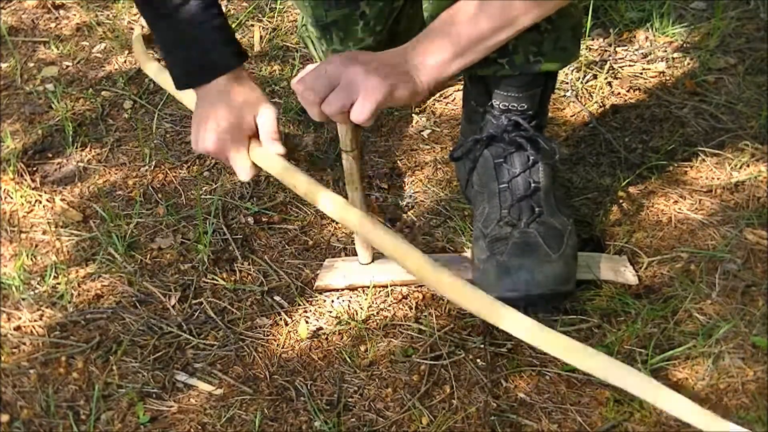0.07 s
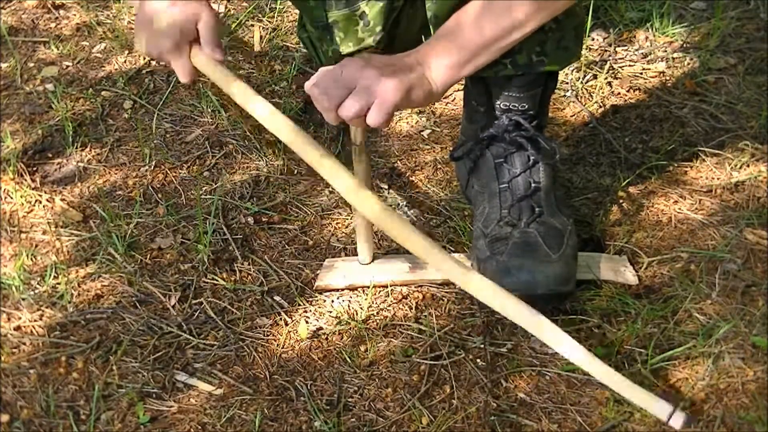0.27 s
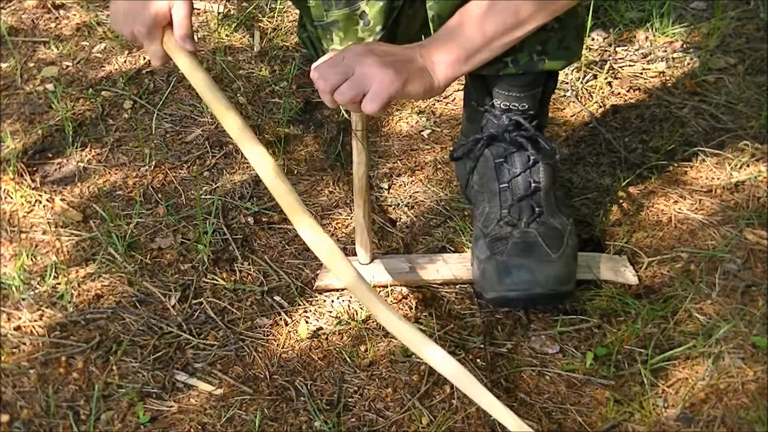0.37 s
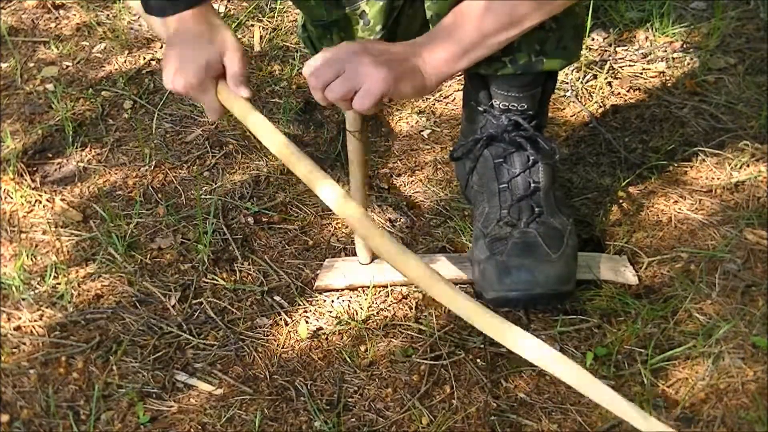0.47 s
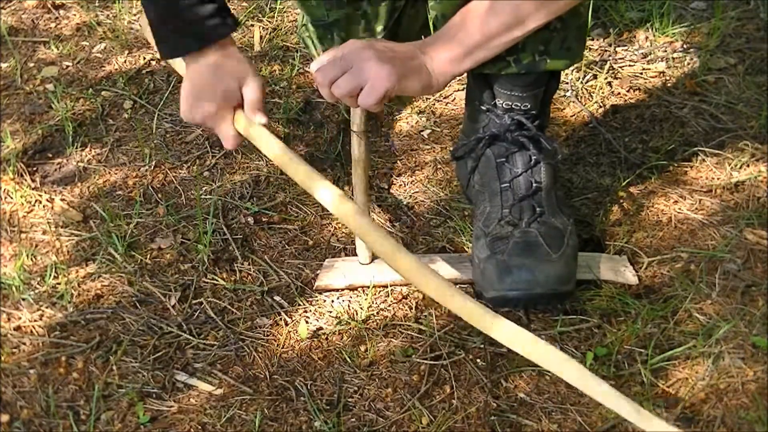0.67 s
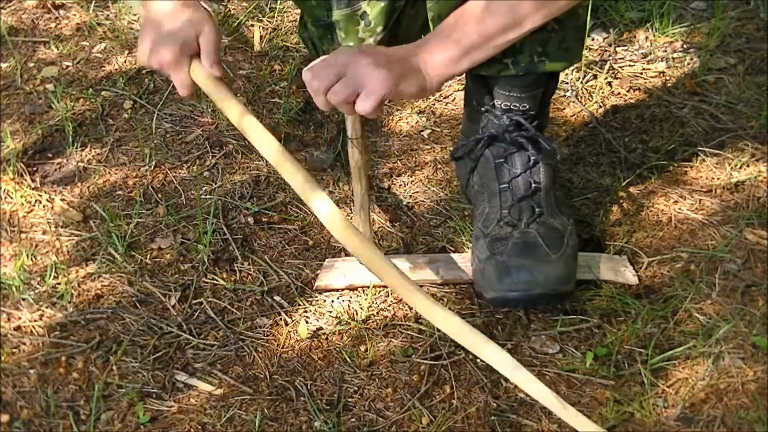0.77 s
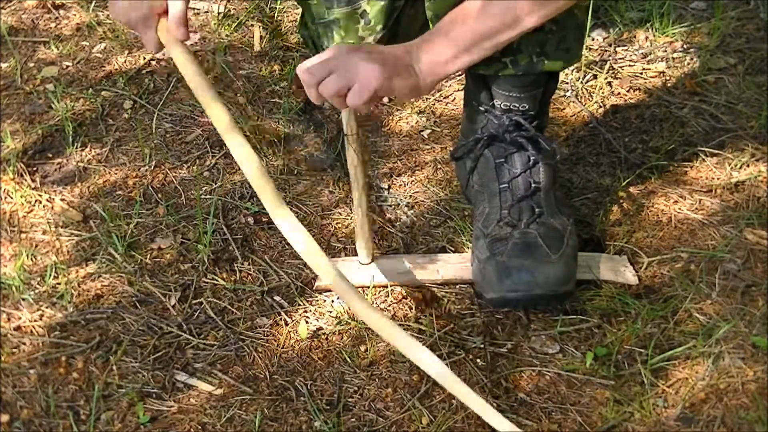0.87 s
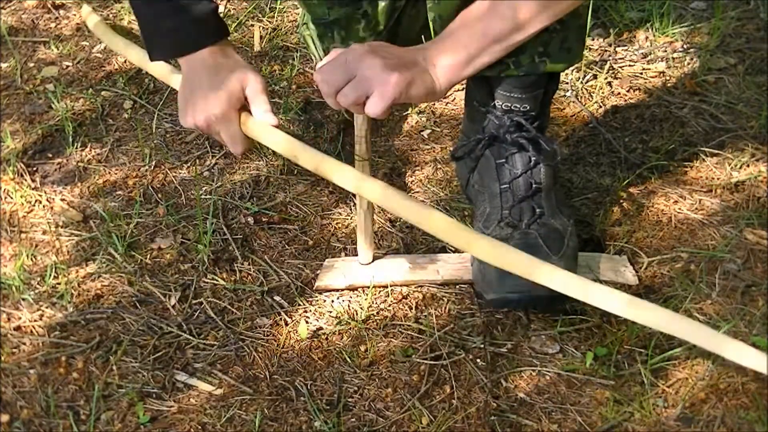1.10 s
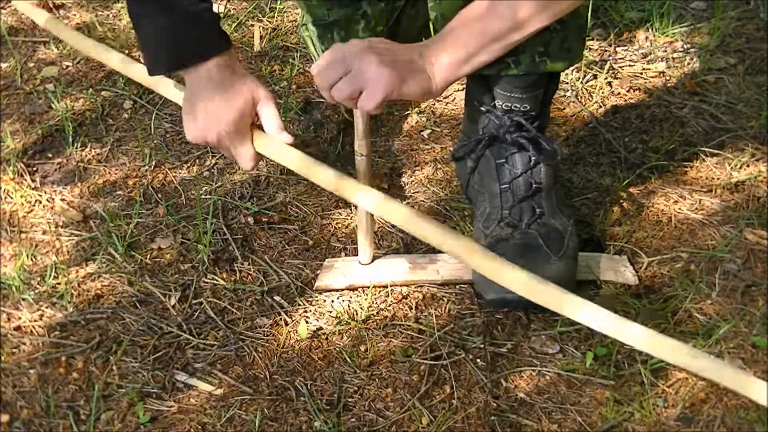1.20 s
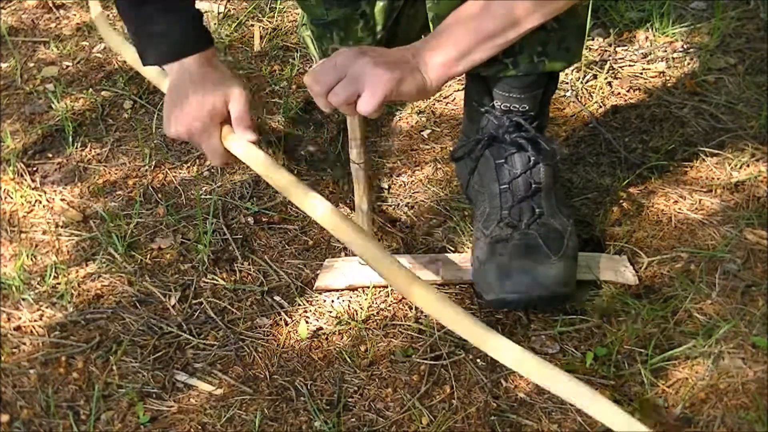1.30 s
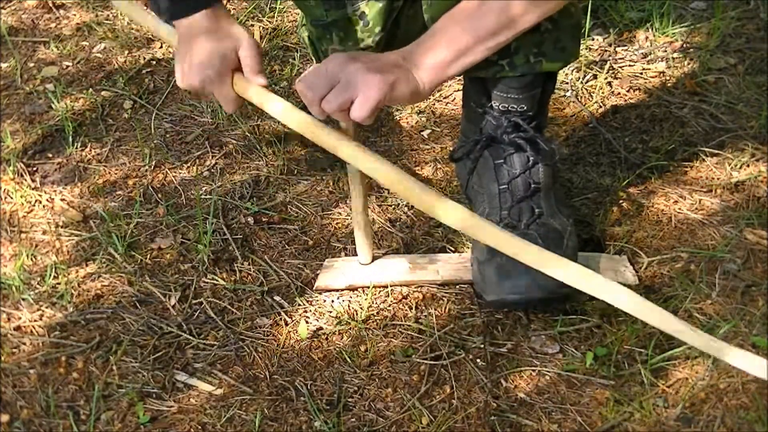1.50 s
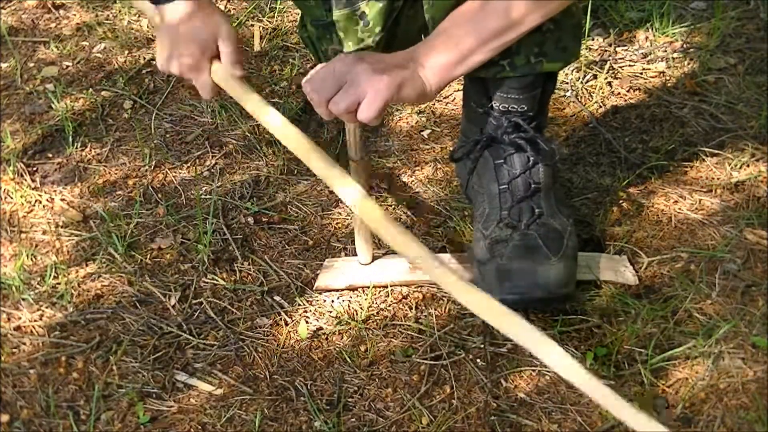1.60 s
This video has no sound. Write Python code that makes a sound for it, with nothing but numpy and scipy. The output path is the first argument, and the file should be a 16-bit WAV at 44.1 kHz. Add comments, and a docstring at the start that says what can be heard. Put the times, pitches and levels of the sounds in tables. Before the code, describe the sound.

A wooden bow drill rasps against a board in about five uneven strokes, close to the microphone. The spindle chirps twice near 0.25 seconds, squeaks around 0.5, and knocks dryly at 0.7 and just after 1 second. A softer stroke with a small chirp follows at 1.5. Dry needles tick faintly, with quiet forest air and a thin, distant whistling tone behind.

```python
"""A bow drill worked back and forth on a forest floor, close to a stereo microphone.
On each stroke the wooden spindle rasps in its socket, catches in short chirps and squeaks,
and knocks against the board. Dry needles tick on the ground and the trees return a faint echo.
Behind it lie quiet forest air and a thin, far whistle."""
import sys
import numpy as np
from scipy import signal
from scipy.fft import rfft, irfft
from scipy.io import wavfile

SR = 44100
rng = np.random.default_rng(int(sys.argv[2]) if len(sys.argv) > 2 else 0)


def wav_record(signal):
    """Record a signal, one row per channel, as 16-bit PCM in the file named by sys.argv[1]."""
    frames = np.transpose(np.atleast_2d(signal))
    bounded = np.clip(frames, -1, 1)
    # unit amplitude maps onto the largest positive 16-bit level
    quanta = np.round(bounded * 32767).astype(np.int16)
    wavfile.write(sys.argv[1], SR, quanta)


N = 72765
LEAD = SR // 10  # samples by which the close tracks start ahead of time zero


def amp(db):
    """Decibels to gain."""
    return 10 ** (np.asarray(db) / 20)


def unit(x):
    """Scales to rms 1."""
    return x / np.sqrt(np.mean(x ** 2) + 1e-20)


def read(points, hz):
    """Reads a table on a log-frequency axis."""
    f, value = np.transpose(points)
    return np.interp(np.log(hz + 1), np.log(f + 1), value)


def colour(x, points):
    """Filters by a table of (frequency [Hz], gain [dB])."""
    return irfft(rfft(x) * amp(read(points, np.fft.rfftfreq(len(x), 1 / SR))), len(x))


def wander(size, hz):
    """Smooth random drift of rms about 1, rolling off above the given rate."""
    rolloff = 1 + (np.fft.rfftfreq(2 * SR, 1 / SR) / hz) ** 4
    return unit(irfft(rfft(rng.standard_normal(2 * SR)) / rolloff))[:size]


def add(track, s, sound):
    """Mixes a sound in at s seconds; the track begins LEAD samples early."""
    part = track[max(LEAD + round(s * SR), 0):][:len(sound)]
    part += sound[:len(part)]


def burst(length, points, tilt_db=0, size=2048):
    """A puff of coloured friction noise: returns its start relative to its centre [s] and the puff."""
    t, hz = (np.arange(size) - size / 2) / SR, np.fft.rfftfreq(size, 1 / SR)
    shape = np.exp(-(2 * t / length) ** 2)
    gain = amp(read(points, hz) + tilt_db * np.log2(np.maximum(hz, 400) / 1000))
    x = rng.standard_normal(size)
    for _ in range(3):  # impose envelope and spectrum in turn
        x = irfft(gain * np.exp(1j * np.angle(rfft(x * shape))))
    return t[0], unit(x * np.hanning(size)) * np.sqrt(np.mean(shape ** 2))


def forest_air(level_db=-47):
    """Quiet, steady rustle of the forest, nearly the same in both channels."""
    # colour of the air (frequency [Hz], gain [dB])
    air_colour = [(15, -56), (25, -12.5), (102, -6.5), (274, -3), (330, -8), (409, -3), (609, -1.5),
                  (795, -2), (861, -4), (1010, -6), (1430, -8.5), (2070, -12), (2630, -15), (3350, -10),
                  (6010, -19.5), (6680, -25), (14500, -43.5)]
    # likeness of left and right (frequency [Hz], correlation [0-1])
    air_likeness = [(30, 1), (100, 0.89), (500, 0.96), (2000, 0.93), (6000, 0.9), (12000, 1)]
    left, other = rfft(rng.standard_normal((2, N)))
    same = np.clip(read(air_likeness, np.fft.rfftfreq(N, 1 / SR)), 0, 1)
    right = same * left + np.sqrt(1 - same ** 2) * other
    pair = np.array([colour(irfft(spectrum, N), air_colour) for spectrum in (left, right)])
    return amp(level_db + 0.23 * wander(N, 30)) * unit(pair)


def far_whistle(start_s=-0.3, end_s=1.5, hz=2099, level_db=-56, blur_hz=45):
    """A thin, blurred tone swells and fades far from the microphone."""
    t = np.arange(N) / SR
    progress = np.clip((t - start_s) / (end_s - start_s), 0, 1)
    swell = np.sqrt(np.sin(np.pi * progress).clip(0))
    phase = 2 * np.pi * hz * t
    tone = wander(N, blur_hz) * np.sin(phase) + wander(N, blur_hz) * np.cos(phase)
    return amp(level_db) * swell * tone


def spindle_squeaks(sag=0.033, jitter=0.024, unrest_hz=1100, shimmer_db=0.77):
    """Two stick-slip tones compete in short, unsteady bursts, each sagging slightly in pitch."""
    # squeaks (centre [s], length [s], upper tone [Hz], its level [dB], lower tone [Hz],
    # its level [dB], gain on all its harmonics but the second [dB])
    squeaks = [(-.035, 0.0083, 2832, -10, 2374, -16, -2.5), (.006, 0.0099, 2660, -31, 2460, -45, 2.5),
               (.418, .011, 2960, -29.5, 2340, -38.5, -11), (0.4432, .0065, 2964, -19, 2400, -28, -16),
               (.462, .012, 2720, -25.5, 2350, -50, -9), (0.473, .0065, 2886, -24.5, 2320, -20.5, -28),
               (.485, .0058, 2820, -8, 2310, -34, -1), (0.4922, .008, 2839, -13, 2323, -31, -23),
               (0.4948, .0036, 2728, -6.5, 2353, -12.5, -5.5), (0.498, .008, 2770, -38, 2348, -15.5, -1.5)]
    # harmonics of the upper tone, from the fundamental up (level [dB])
    upper_harmonics = [0.5, -12, -41, -25]
    # harmonics of the lower tone, likewise (level [dB])
    lower_harmonics = [-3.5, 2, -4.5, -8, -15]
    out = np.zeros(LEAD + N)
    for centre, length, upper_hz, upper_db, lower_hz, lower_db, full_db in squeaks:
        t = np.arange(-length / 2, length / 2, 1 / SR)
        bend = 1 - sag * t / length + jitter * wander(len(t), unrest_hz)
        phase_per_hz = 2 * np.pi * np.cumsum(bend) / SR
        upper = sum(amp(upper_db + db) * np.sin(k * upper_hz * phase_per_hz)
                    for k, db in enumerate(upper_harmonics, 1))
        lower = sum(amp(lower_db + db + full_db * (k != 2)) * np.sin(k * lower_hz * phase_per_hz)
                    for k, db in enumerate(lower_harmonics, 1))
        shape = np.cos(np.pi * t / length) ** 2 * amp(shimmer_db * wander(len(t), unrest_hz))
        add(out, centre - length / 2, (upper + lower) * shape)
    return out


def dry_needles():
    """Dry needles tick and shift on the ground by the drill."""
    # ticks (centre [s], length [s], level [dB], treble tilt [dB/octave])
    ticks = [(.05, .002, -48.5, 4), (.354, 0.014, -43, -6), (0.778, 0.0051, -42, -1.5),
             (0.833, 0.015, -50, 2), (1.192, .002, -50, 5)]
    # colour of a tick (frequency [Hz], gain [dB])
    tick_colour = [(80, -46), (300, 0), (900, -1.5), (3000, 3), (7500, -18), (11000, -13.5), (14000, -42)]
    out = np.zeros(LEAD + N)
    for centre, length, db, tilt_db in ticks:
        offset, puff = burst(length, tick_colour, tilt_db)
        add(out, centre + offset, amp(db) * puff)
    return out


def spindle_rubbing(grains_per_s=14000, spread_db=2.5, flutter_hz=127, flutter_db=4):
    """Dense grains of friction swell with the bow's speed and flutter as the spindle turns."""
    # bow strokes (time of top speed [s], rise [s], fall [s], rub [dB], hiss [dB], singing [dB])
    strokes = [(0.183, 0.064, 0.043, -42.5, -45.5, -53), (0.454, 0.058, 0.049, -39.5, -42.5, -46),
               (.655, 0.13, 0.088, -44.5, -50.5, -70), (1.009, 0.042, 0.051, -40.5, -61, -37),
               (1.477, 0.055, 0.073, -48, -47.5, -61), (1.558, 0.057, 0.039, -44, -73, -69)]
    # colour of the rub (frequency [Hz], gain [dB])
    rub_colour = [(100, -44), (300, -2.5), (700, -9), (1200, -9), (1900, -1.5), (2300, -10.5), (2850, 1),
                  (3400, -5.5), (4150, 4), (5300, -3), (6200, -11), (7000, -15.5), (7600, -22),
                  (10000, -11), (11500, -29), (14000, -37)]
    # colour of its high hiss (frequency [Hz], gain [dB])
    hiss_colour = [(100, -48), (3000, -11), (5300, 8.5), (6400, -3.5), (7000, -1), (7600, -13),
                   (8800, -4.5), (9900, 3.5), (11000, -7.5), (12500, -25), (14000, -34)]
    # singing resonances of the spindle (frequency [Hz], width [Hz], gain [dB])
    resonances = [(2850, 350, -6), (4450, 520, 1), (9950, 750, -7)]
    # rough spots where it scrapes harder (centre [s], length [s], level [dB])
    rasps = [(.155, .01, -40), (0.165, 0.0093, -39), (0.1904, 0.016, -30.5), (0.202, 0.0064, -32),
             (0.213, 0.017, -32), (0.23, 0.0034, -31), (.2445, 0.0084, -34), (0.253, 0.012, -37.5),
             (0.272, 0.018, -36.5), (0.297, 0.017, -37), (0.442, 0.013, -28), (0.468, 0.0089, -33),
             (0.4942, 0.0057, -26), (0.639, 0.0091, -33), (0.679, 0.0095, -34), (0.983, 0.014, -38),
             (1.011, .007, -39.5), (1.036, 0.007, -30), (1.049, .006, -38), (1.061, 0.014, -30),
             (1.071, 0.0078, -34), (1.087, 0.0088, -40), (1.414, 0.013, -45.5), (1.519, 0.024, -40.5),
             (1.56, 0.0073, -38), (1.605, 0.017, -42)]
    t = np.arange(-LEAD, N) / SR
    levels = np.zeros((3, len(t)))
    for top, rise, fall, *db in strokes:
        levels += amp(db)[:, None] * np.exp(-((t - top) / np.where(t < top, rise, fall)) ** 2)
    grains = rng.standard_normal(levels.shape) * (rng.random(levels.shape) < grains_per_s / SR)
    grains *= amp(spread_db * np.minimum(rng.exponential(1, grains.shape), 4))
    rub = unit(colour(grains[0], rub_colour))
    hiss = unit(colour(grains[1], hiss_colour))
    f = np.fft.rfftfreq(len(t), 1 / SR)
    peaks = sum(amp(db) / (1 + (1.36 * (f - hz) / width) ** 2) for hz, width, db in resonances)
    singing = unit(irfft(rfft(grains[2]) * peaks, len(t)))
    out = (levels * [rub, hiss, singing]).sum(0) * amp(flutter_db * wander(len(t), flutter_hz))
    for centre, length, db in rasps:
        offset, puff = burst(length, rub_colour)
        add(out, centre + offset, amp(db) * puff)
    return out


def board_knocks(rise_s=0.00025):
    """The spindle jumps in its notch: a dry snap and a short ring of the board."""
    # wood on wood (centre [s], length [s], snap [dB], treble tilt [dB/octave], ring [dB])
    knocks = [(0.1905, 0.0037, -39, 0, -53), (0.2338, 0.0019, -18.5, -2.5, -61),
              (0.2787, 0.0018, -20, -4, -45), (0.442, 0.0059, -33, -13.5, -38),
              (0.474, 0.0072, -31.5, -5.5, -37), (0.6982, 0.0023, -15, 1.5, -20.5),
              (0.7065, 0.001, -21, 3, -25), (0.7156, 0.0039, -23, -0.5, -24), (.722, 0.0079, -29, -1, -25),
              (0.8522, 0.0036, -26.5, -3, -41.5), (1.0389, 0.0012, -12, -0.5, -30),
              (1.05, .003, -24.5, -5.5, -36), (1.06, 0.0033, -51, -7, -57),
              (1.522, 0.0026, -27.5, 1.5, -69)]
    # colour of a snap (frequency [Hz], gain [dB])
    snap_colour = [(60, -29), (150, -17), (300, -7), (500, -7), (850, 1.5), (1600, 2.5), (2200, -6),
                   (2650, -1.5), (3300, -10.5), (4300, -7), (6500, -23.5), (7800, -31), (10000, -26.5),
                   (14000, -44)]
    # modes of the board (frequency [Hz], level [dB], t60 [s])
    modes = [(344.3, -12, 0.13), (530, -16, 0.063), (658, -10, 0.063), (864, -10, 0.084),
             (1005, -1.5, 0.034), (1208, -2.5, 0.043), (1370, -3, 0.023), (1710, 1.5, 0.017),
             (2000, -4, 0.028), (2255, 0.5, 0.028), (2520, -24, 0.038), (3070, -5, 0.029),
             (6460, -5.5, 0.011)]
    out, t = np.zeros(LEAD + N), np.arange(SR // 8) / SR
    for centre, length, snap_db, tilt_db, ring_db in knocks:
        offset, snap = burst(length, snap_colour, tilt_db)
        add(out, centre + offset, amp(snap_db) * snap)
        ring = sum(amp(db - 60 * t / t60) * np.sin(2 * np.pi * (hz * t + rng.random()))
                   for hz, db, t60 in modes)
        add(out, centre, amp(ring_db) * ring * (1 - np.exp(-t / rise_s)))
    return out


def spindle_chirps(sag_hz=308, rise_s=0.00045, echo_s=0.0054, echo_db=-19):
    """The spindle grips and shudders for a few milliseconds, falling in pitch; the ground reflects it."""
    # catches (start [s], length [s], pitch [ratio], level [dB], gain on upper partials [dB])
    chirps = [(0.2331, 0.0035, 0.99, -8, 0.5), (.2759, .0039, 0.99, -8, -1.5),
              (1.5212, 0.0049, 1.058, -22.5, -7)]
    # partials of a chirp (frequency [Hz], level [dB])
    chirp_partials = [(1715, 0), (2770, -7.5), (4280, -4.5), (5100, -19), (6850, -29)]
    out = np.zeros(LEAD + N)
    for start, length, ratio, db, upper_db in chirps:
        t = np.arange(0, 2 * length, 1 / SR)
        shape = (1 - np.exp(-(t / rise_s) ** 2)) * np.exp(-(t / (0.93 * length)) ** 4)
        sag = sag_hz * (.5 - t / length)
        partials = []
        for k, (hz, level) in enumerate(chirp_partials):
            phase = 2 * np.pi * np.cumsum(hz * ratio + sag) / SR
            partials.append(amp(db + level + upper_db * (k > 0)) * shape * np.sin(phase))
        add(out, start, sum(partials))
        dulled = partials[0] + 0.54 * sum(partials[1:])
        add(out, start + echo_s, amp(echo_db) * dulled)
    return out


def among_trees(x, echo_db, onset_s=0.016, width=0.15):
    """The direct sound plus scattered echoes from trunks and ground, a little unlike in each channel."""
    # decay of the echo (frequency [Hz], t60 [s])
    decay = [(300, 0.9), (1500, 0.36), (3000, 0.24), (7000, 0.29), (10000, 0.32)]
    # colour of the echo (frequency [Hz], gain [dB])
    echo_colour = [(200, 4.5), (1500, -3), (2350, 9.5), (2850, -1), (4000, 2.5), (4700, 0), (5700, -6.5),
                   (7000, 6.5), (9500, -7.5), (14000, -10)]
    hz, t, noise = signal.stft(rng.standard_normal((2, SR // 2)), SR, nperseg=256)
    fading = noise * amp(-60 * t / read(decay, hz)[:, None]) * (1 - np.exp(-(t / onset_s) ** 2))
    _, tails = signal.istft(fading, SR, nperseg=256)
    mid, side = [colour(tail, echo_colour) / np.linalg.norm(tail) for tail in tails]
    response = np.array([mid + width * side, mid - width * side])
    return x + amp(echo_db) * signal.fftconvolve(x[None], response, axes=1)[:, :len(x)]


def scene(right_db=0.66):
    """The drill close up, just right of centre, with the forest behind it."""
    drill = (among_trees(spindle_rubbing() + dry_needles(), echo_db=-14.5)
             + among_trees(spindle_chirps(), echo_db=-23.5)
             + among_trees(spindle_squeaks(), echo_db=-11.5)
             + among_trees(board_knocks(), echo_db=-21))
    balance = amp([[-right_db / 2], [right_db / 2]])
    return (drill[:, LEAD:] + forest_air() + far_whistle()) * balance


def record(dry, low_cut_hz=55, top_hz=14600):
    """The recorder's low cut and band limit."""
    dry = signal.sosfilt(signal.butter(2, low_cut_hz, "high", fs=SR, output="sos"), dry)
    band_limit = signal.firwin(255, top_hz, window=("kaiser", 9), fs=SR)
    return signal.oaconvolve(dry, band_limit[None], "same")


dry = scene()
out = record(dry)
wav_record(out)
```